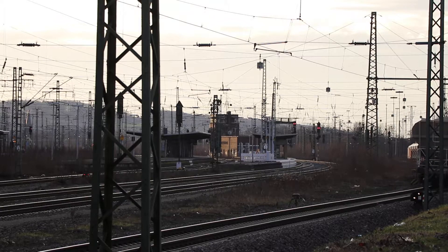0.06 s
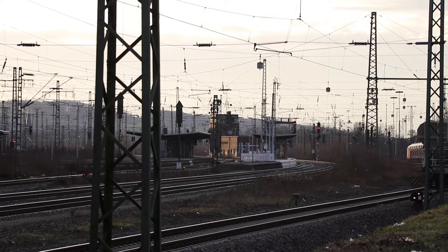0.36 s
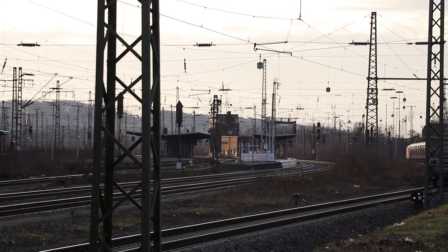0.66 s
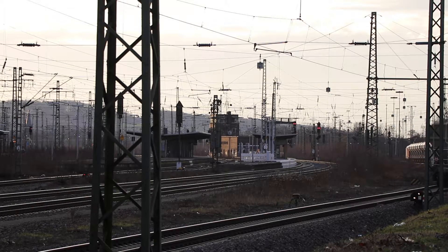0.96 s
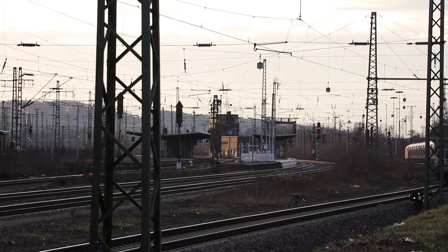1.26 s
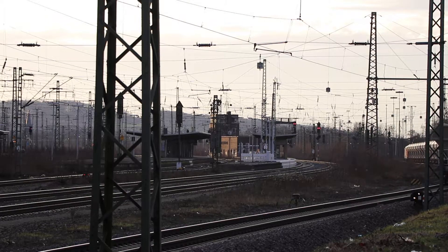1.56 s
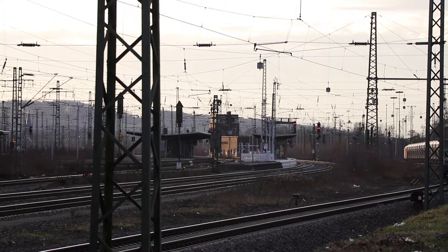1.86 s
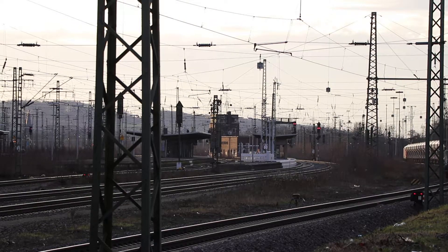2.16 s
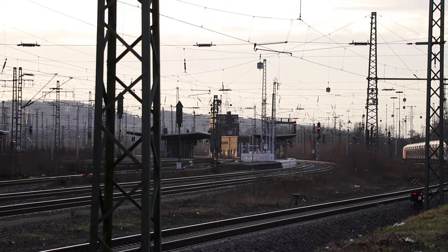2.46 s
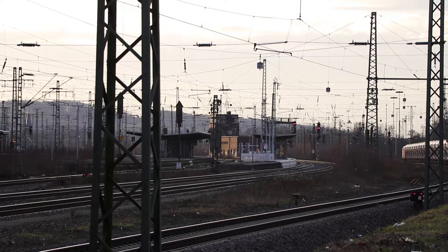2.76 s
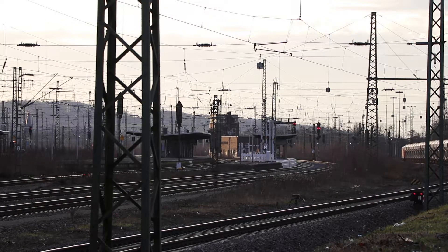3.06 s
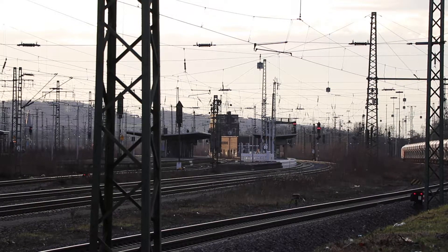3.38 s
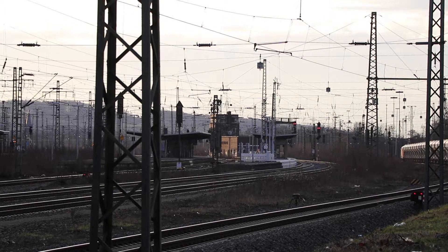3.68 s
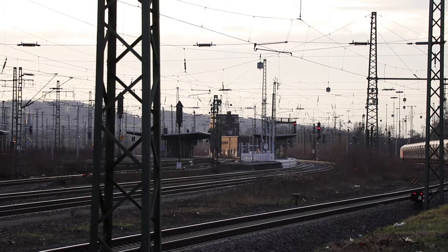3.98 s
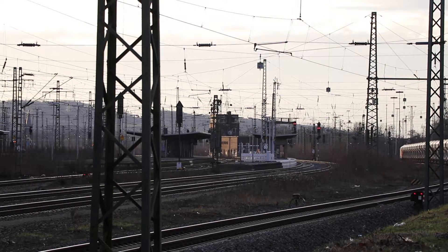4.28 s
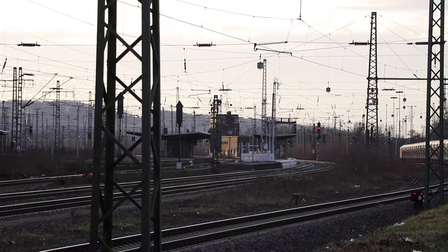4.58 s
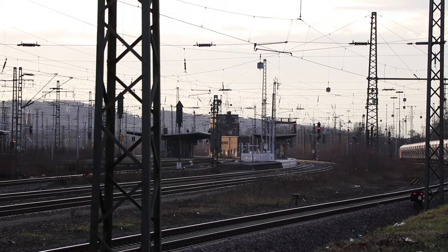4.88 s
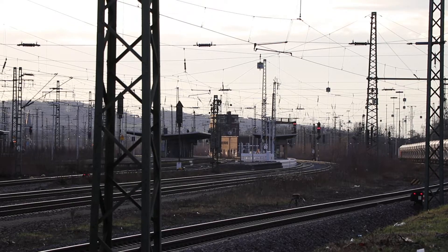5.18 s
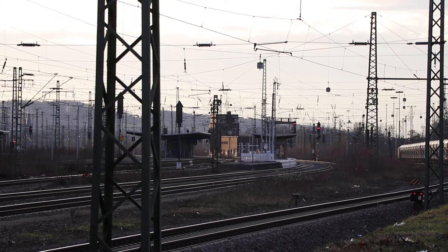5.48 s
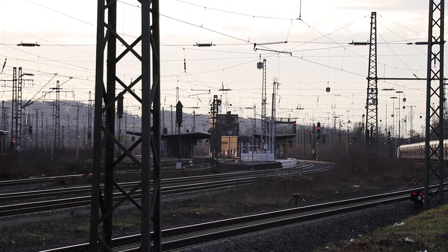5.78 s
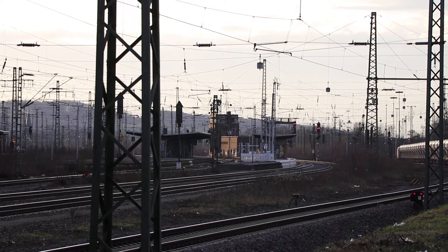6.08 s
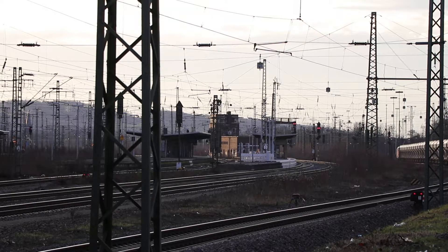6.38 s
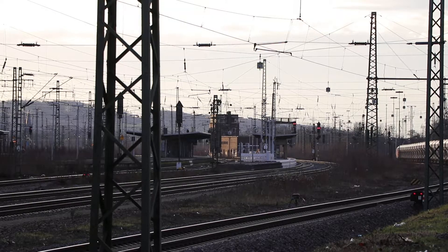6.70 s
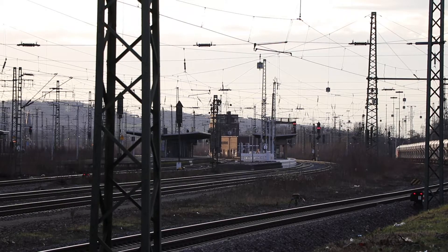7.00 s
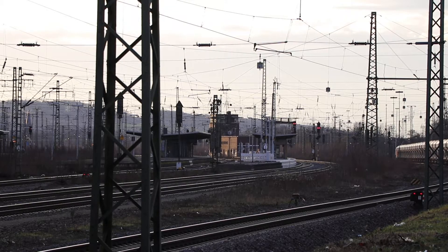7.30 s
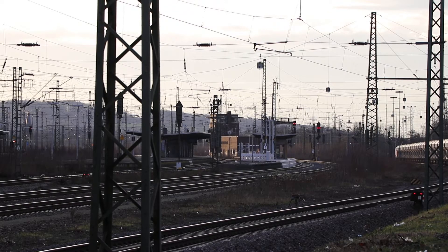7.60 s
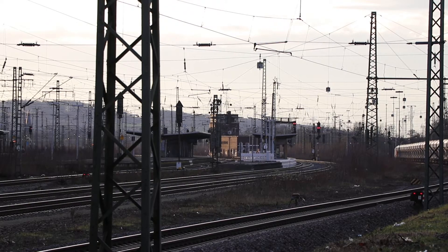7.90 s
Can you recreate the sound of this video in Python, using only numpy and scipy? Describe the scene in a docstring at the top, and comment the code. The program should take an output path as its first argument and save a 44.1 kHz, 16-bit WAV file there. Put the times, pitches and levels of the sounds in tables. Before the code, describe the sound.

A distant freight train rolls away with a soft roar, while gusts of wind buffet the microphone and something dry ticks nearby.

```python
"""Freight train leaving a windy yard

Far across a rail yard a freight train rolls away: wheels roar softly and the ring of steel fades.
Out there too are one clank, one small squeak and an engine gathering speed.
Something dry ticks and rustles close to the microphone.
Wind eddies buffet the microphone itself, lightly at first and hard in the second half."""
import sys
import numpy as np
from scipy import signal
from scipy.fft import rfft, irfft
from scipy.io import wavfile

SR = 44100
rng = np.random.default_rng(int(sys.argv[2]) if len(sys.argv) > 2 else 0)


def bounce(signal):
    """Save signal as a 16-bit WAV file at the path given by the first command-line argument."""
    frames = np.transpose(np.atleast_2d(signal))
    limited = np.clip(frames, -1, 1)
    pcm = np.round(limited * 32767).astype(np.int16)
    wavfile.write(sys.argv[1], SR, pcm)


N = 355005
TIME, BINS = np.arange(N) / SR, np.fft.rfftfreq(N, 1 / SR)


# Wheels on rails, far across the yard: time_s, level_db
ROAR_LEVELS = [(0, -54), (1.25, -53), (1.8, -54.5), (2.9, -56), (3.9, -54), (4.5, -53.5), (6.0, -54.5),
               (6.7, -51), (7.25, -54.5), (8.05, -55)]
# Their spectrum at the microphone: frequency_hz, density_db
ROAR_SPECTRUM = [(300, -22.5), (600, -6), (760, -2), (920, 0.5), (1100, -1), (1500, -2), (2000, -8.5),
                 (2400, -11.5), (3000, -13.5), (4200, -20.5), (6500, -30), (10000, -44)]
def wheel_roar(dulling_db_per_s=-0.25, treble_hz=2500):
    """Rough wheels roar on the rails, losing treble as the train draws away."""
    roar = noise(colour(ROAR_SPECTRUM))
    treble = shaped(roar, BINS ** 2 / (BINS ** 2 + treble_hz ** 2))
    dulled = roar + treble * (gain_of(dulling_db_per_s * TIME) - 1)
    return dulled * gain_of(follow(ROAR_LEVELS) + 0.42 * wander(6.9))


# Hollow swells from the distant wheels: centre_s, half_width_s, level_db
ROLLING_SWELLS = [(1.28, .38, -57), (2.25, 0.55, -59.5), (4.55, 0.3, -57), (7.0, 1, -60)]
def hollow_rolling(start_hz=1040.3, sag_hz_per_s=-23, width_hz=130):
    """A narrow band of wheel noise comes in swells and sinks in pitch as the train recedes."""
    phase = phase_of(start_hz + sag_hz_per_s * TIME)
    band = wander(width_hz) * np.cos(phase) + wander(width_hz) * np.sin(phase)
    return swells(ROLLING_SWELLS) * band


# Resonances of the far wheels and rails: pitch_hz, width_hz, gain_db
STEEL_MODES = [(1813, 120, -0.5), (2135, 96, -3), (2590, 120, -0.5), (2763, 120, -2), (3232, 18, -10),
               (3520, 110, -10), (4240, 210, -12)]
# Single wheels flaring up down the line: centre_s, half_width_s, pitch_hz, width_hz, level_db
WHEEL_FLARES = [(.08, .1, 2700, 170, -63), (.32, 0.25, 1810, 130, -62.5), (.62, 0.062, 2700, 130, -58),
                (1.05, 0.51, 1260, 260, -59.5), (3.35, .14, 4230, 160, -75), (3.4, .3, 2750, 170, -67)]
def steel_ring(far_db=-61, near_excess_db=8.5, fade_s=0.81, sink_db_per_s=-0.62):
    """Wheels and rails ring, fading quickly as the last wagon leaves and slowly after that."""
    steel = sum(noise(resonances([(hz, width, 0)])) * gain_of(db + 0.72 * wander(5.5))
                for hz, width, db in STEEL_MODES)
    flares = sum(noise(resonances([(hz, width, 0)])) * swells([(centre_s, half_width_s, db)])
                 for centre_s, half_width_s, hz, width, db in WHEEL_FLARES)
    ring_db = far_db + near_excess_db * np.exp(-TIME / fade_s) + sink_db_per_s * TIME
    return evened(steel) * gain_of(ring_db + 1.03 * wander(13)) + flares


# Wagon bodies, heard across the yard: frequency_hz, density_db
WAGON_SPECTRUM = [(80, -7), (150, 1), (230, -0.5), (290, -2.5), (350, 1), (480, -5.5), (650, -16),
                  (1200, -47)]
# Their drumming further down the line: centre_s, half_width_s, level_db
WAGON_SWELLS = [(6.2, 0.98, -57)]
def wagon_drumming(start_db=-53, fade_db_per_s=-2.5):
    """The wheels drum the wagon bodies; the sound fades with distance, then swells once more."""
    level = np.hypot(gain_of(start_db + fade_db_per_s * TIME), swells(WAGON_SWELLS))
    return noise(colour(WAGON_SPECTRUM)) * level * gain_of(wander(16))


# Strength of the wind right on the microphone: time_s, level_db
GUST_LEVELS = [(0.0, -28), (0.25, -38), (0.7, -44.5), (1.02, -41), (1.16, -32.5), (1.65, -45.5), (2.2, -54),
               (2.5, -45.5), (3.0, -62), (4.1, -59), (4.23, -36.5), (4.8, -32), (5.0, -27.5), (5.65, -26),
               (6.42, -30.5), (6.87, -20.5), (7.05, -27.5), (7.4, -27.5), (7.66, -30), (8.05, -18)]
# Big eddies in a gust, big eddies in a breeze, and small eddies: frequency_hz, density_db
GUST_SPECTRUM = [(8, -11), (20, -1), (35, 1), (62, 1), (90, -4.5), (125, -12.5), (200, -28.5), (400, -76),
                 (2000, -110)]
BREEZE_SPECTRUM = [(8, -25), (20, -4.5), (35, 1.5), (58, -4), (80, -9), (115, -18.5), (200, -37),
                   (2000, -110)]
FLUTTER_SPECTRUM = [(50, -16), (85, -8.5), (115, 0), (160, -12.5), (220, -15.5), (320, -25), (600, -42.5),
                    (1500, -90), (5000, -110)]
def wind(breeze_db=-36.5, full_gust_db=-29.5, lag_s=0.18, flutter_db=-43, flutter_growth=1.48):
    """Big eddies thud on the microphone, deeper in slow air; small ones break off a moment later."""
    gust_db = follow(GUST_LEVELS)
    pole = np.exp(-1 / (lag_s * SR))
    lagged_db = 20 * np.log10(signal.lfilter([1 - pole], [1, -pole], gain_of(gust_db)) + 1e-6)
    gust_share = np.clip((lagged_db - breeze_db) / (full_gust_db - breeze_db), 0, 1)
    fast = np.sqrt(gust_share) * eddies(GUST_SPECTRUM, hold_s=0.094)
    slow = np.sqrt(1 - gust_share) * eddies(BREEZE_SPECTRUM, hold_s=0.063)
    # The small eddies grow faster than the wind does.
    small_db = flutter_db + flutter_growth * (lagged_db - full_gust_db) + 3 * wander(28)
    thudding = (fast + slow) * gain_of(gust_db + 0.28 + 2 * wander(15))
    return thudding + eddies(FLUTTER_SPECTRUM, hold_s=0.084) * gain_of(small_db)


def eddies(spectrum, hold_s):
    """Turbulent pressure whose strength stays steady over spans longer than hold_s."""
    pressure = noise(colour(spectrum))
    power = shaped(pressure ** 2, np.exp(-(BINS * hold_s) ** 2))
    return pressure / np.sqrt(np.maximum(power, 0) + 0.049)


# Single eddies that hit the microphone squarely: centre_s, level_db, pitch_hz
EDDY_HITS = [(0.016, -17.5, 53.6), (0.1, -25.5, 42), (1.18, -28.5, 53), (4.254, -23, 58.6),
             (4.465, -28.5, 50.5), (4.575, -25, 60), (4.634, -33, 159), (4.91, -22.5, 108),
             (5.161, -20.5, 136), (5.31, -21, 74), (5.527, -18, 104), (5.851, -15.5, 54.6),
             (5.875, -26.5, 146), (5.97, -23, 123), (6.816, -14.5, 53), (6.939, -19, 125),
             (7.45, -18.5, 107), (7.912, -18.5, 173), (7.962, -13.5, 65.6), (8.01, -17.5, 120)]
def wind_thumps(half_width_cycles=0.75):
    """Each eddy is a push and a pull of pressure, a cycle or two long."""
    out = np.zeros(N)
    for centre_s, db, hz in EDDY_HITS:
        cycles = (TIME - centre_s) * hz
        envelope = gain_of(db) * np.exp(-(cycles / half_width_cycles) ** 2)
        out += envelope * np.sin(2 * np.pi * (cycles + rng.random()))
    return out


# Small dry ticks close to the microphone: start_s, peak_db, centre_hz, t60_s
CLOSE_TICKS = [(1.281, -56, 6000, .05), (1.398, -53, 5000, .04), (1.597, -48.5, 5400, .04),
               (2.452, -53, 5800, 0.14), (2.515, -57, 6300, .05), (2.607, -51, 7450, .035),
               (3.208, -55, 7800, .04), (3.217, -47, 7900, 0.02), (3.227, -51, 6500, 0.044),
               (3.305, -44.5, 6200, 0.05), (3.329, -53, 7400, .04), (3.353, -53, 7600, .035),
               (3.376, -53.5, 7400, .035), (3.455, -52, 7800, .035), (3.488, -54, 7500, .04),
               (3.589, -55, 6800, 0.073), (6.516, -47, 5650, 0.021)]
# The resonances they share: pitch_hz, width_hz, gain_db
TICK_RESONANCES = [(3620, 1500, 2), (5700, 1000, 0), (6960, 500, -0.5), (8250, 460, 0), (10300, 1400, -8)]
def ticks(spread_octaves=0.85, rise_s=0.00082):
    """Each tick is a brief crunch that rings a few damped modes, brighter or duller."""
    t = np.arange(SR // 4) / SR
    hz = np.fft.rfftfreq(len(t), 1 / SR)
    modes = np.interp(hz, BINS, resonances(TICK_RESONANCES))
    out = np.zeros(N)
    for start_s, peak_db, centre_hz, t60_s in CLOSE_TICKS:
        band = np.exp(-.5 * (np.log2((hz + 1) / centre_hz) / spread_octaves) ** 2)
        crunch = irfft(rfft(rng.standard_normal(len(t))) * modes * band, len(t))
        tick = evened(crunch) * (1 - np.exp(-t / rise_s)) * gain_of(-60 * t / t60_s)
        out[round(start_s * SR):][:len(t)] += gain_of(peak_db) * tick / abs(tick).max()
    return out


def squeak(start_s=2.63, pitch_hz=2067, level_db=-44, rise_s=0.0033, t60_s=0.12, octave_db=-18):
    """Steel slips briefly on steel: one short, nearly pure note."""
    t = np.maximum(TIME - start_s, 0)
    phase = phase_of(pitch_hz * (1 + 0.0038 * wander(60)))
    envelope = gain_of(level_db - 60 * t / t60_s) * (1 - np.exp(-(t / rise_s) ** 2))
    return envelope * (np.sin(phase) + gain_of(octave_db) * np.sin(2 * phase))


# Metal ringing far off in the yard: pitch_hz, width_hz, gain_db
CLANK_RESONANCES = [(2720, 220, -1), (3300, 270, -1), (4900, 500, -20)]
def clank(start_s=1.04, level_db=-49, rise_s=0.0056, t60_s=0.24):
    """One metal clank, blurred by the yard on its way to the microphone."""
    t = np.maximum(TIME - start_s, 0)
    envelope = (1 - np.exp(-t / rise_s)) * gain_of(level_db - 60 * t / t60_s)
    return noise(resonances(CLANK_RESONANCES)) * envelope


# A soft rustle near the microphone: time_s, level_db
RUSTLE_LEVELS = [(4, -70), (4.6, -62.5), (5.3, -69.5), (5.8, -60.5), (6.21, -63.5), (6.29, -56),
                 (6.37, -53.5), (6.45, -58), (6.62, -54.5), (6.78, -58.5), (6.9, -56.5), (7.3, -72)]
# Its spectrum at close range: frequency_hz, density_db
RUSTLE_SPECTRUM = [(300, -2.5), (700, 9.5), (1500, -10.5), (2400, 1), (3400, 0), (4800, -6), (6300, -8.5),
                   (7500, -18), (11000, -40)]
def rustle(grain_db=1.5):
    """A fine-grained dry rustle that swells during the strong gusts."""
    return noise(colour(RUSTLE_SPECTRUM)) * gain_of(follow(RUSTLE_LEVELS) + grain_db * wander(150))


# Moments when a distant engine reaches the microphone: centre_s, half_width_s, level_db
ENGINE_SWELLS = [(2.8, .2, -58.5), (3.06, .13, -51.5), (3.61, .1, -54.5), (4.05, .25, -64)]
def engine(climb_start_s=2.5, low_hz=95.7, top_hz=126, climb_hz_per_s=11.7, octave_db=-13):
    """The firing rate climbs; only its note and octave carry this far, wavering in the air."""
    firing_hz = np.clip(low_hz + climb_hz_per_s * (TIME - climb_start_s), low_hz, top_hz)
    phase = phase_of(firing_hz * (1 + 0.0028 * wander(9.2)))
    note = np.sqrt(2) * (np.sin(phase) + gain_of(octave_db) * np.sin(2 * phase))
    return note * swells(ENGINE_SWELLS) * gain_of(0.65 * wander(5))


# The far yard and the microphone's own hiss: frequency_hz, density_db
YARD_SPECTRUM = [(15, -10.5), (40, 0.5), (70, 0.5), (130, -8), (250, -6.5), (500, -11), (1000, -17),
                 (2500, -27.5), (4500, -30.5), (8000, -33.5), (15500, -35.5)]
def yard_air(level_db=-53.5):
    """A steady rumble and faint hiss behind everything else."""
    return noise(colour(YARD_SPECTRUM)) * gain_of(level_db)


def gain_of(db):
    """Decibels to amplitude."""
    return 10 ** (np.asarray(db) / 20)


def evened(x):
    """Scales to rms 1."""
    return x / np.sqrt(np.mean(x ** 2) + 1e-20)


def phase_of(hz):
    """Running phase in radians of a changing pitch."""
    return 2 * np.pi * np.cumsum(hz) / SR


def follow(rows):
    """Level in dB at every sample, from (time_s, level_db) rows."""
    return np.interp(TIME, *np.transpose(rows))


def swells(rows):
    """Amplitude of bell-shaped swells, added in power."""
    return np.sqrt(sum(gain_of(db) ** 2 * np.exp(-((TIME - centre_s) / half_width_s) ** 2)
                       for centre_s, half_width_s, db in rows))


def colour(points):
    """Gain at every frequency, from (frequency_hz, density_db) points."""
    hz, db = np.transpose(points)
    return gain_of(np.interp(np.log(BINS + 1), np.log(hz + 1), db))


def resonances(modes):
    """Gain at every frequency of a set of steep-sided resonances."""
    return np.sqrt(sum((gain_of(db) / (1 + ((BINS - hz) / (1.08 * width)) ** 2)) ** 2
                       for hz, width, db in modes))


def shaped(x, gains):
    """Filters x by a gain at every frequency."""
    return irfft(rfft(x) * gains, N)


def noise(gains):
    """Noise of rms 1 with the given spectrum."""
    return evened(shaped(rng.standard_normal(N), gains))


def wander(rate_hz):
    """Random drift of rms 1, changing up to about rate_hz times a second."""
    return noise((BINS > .5) / (1 + (BINS / rate_hz) ** 4))


def scene():
    """One microphone in the yard: the train far away, ticks, rustle and wind close by."""
    air = yard_air()
    train = wheel_roar() + steel_ring() + wagon_drumming() + hollow_rolling()
    yard = engine() + clank() + squeak()
    close = ticks() + rustle() + wind() + wind_thumps()
    return (train + yard + close + air)[None]


def record(dry):
    """The recorder's band limit, with a soft start and stop."""
    fades = signal.windows.tukey(N, 400 / N)
    lowpass = signal.firwin(511, cutoff=15750, window=("kaiser", 9), fs=SR)
    return signal.oaconvolve(dry * fades, lowpass[None], "same")


dry = scene()
out = record(dry)
bounce(out)
```